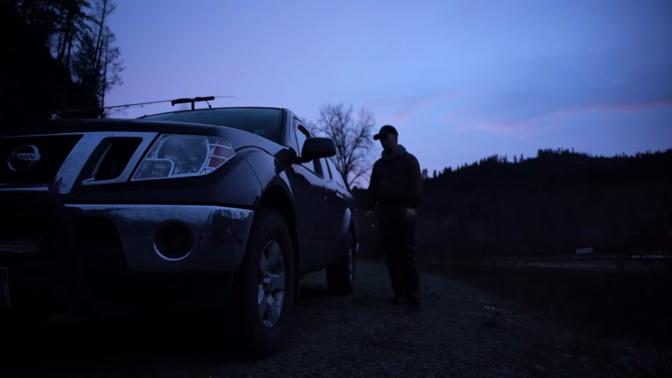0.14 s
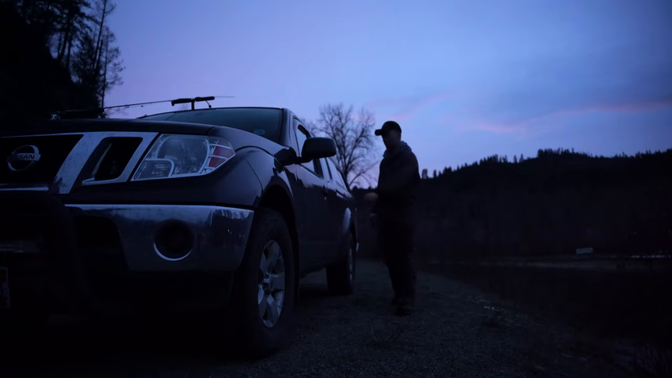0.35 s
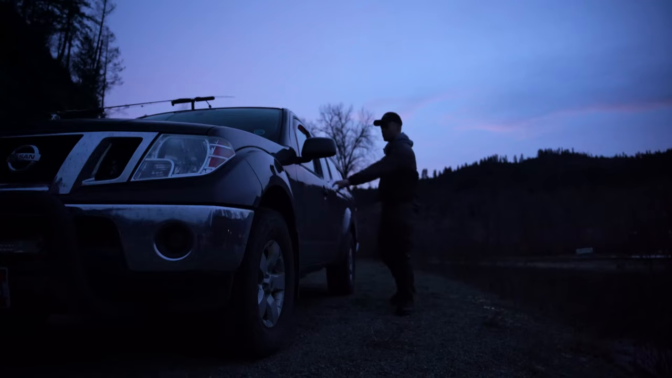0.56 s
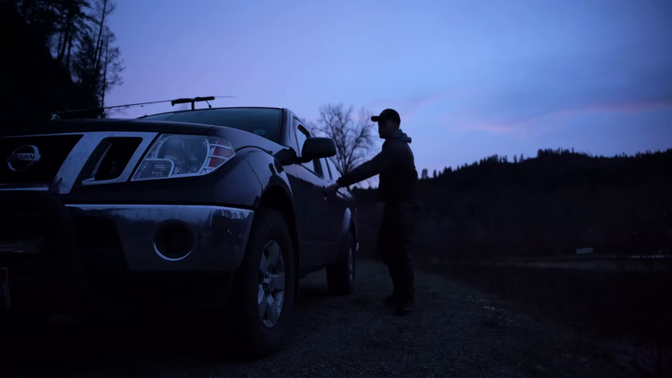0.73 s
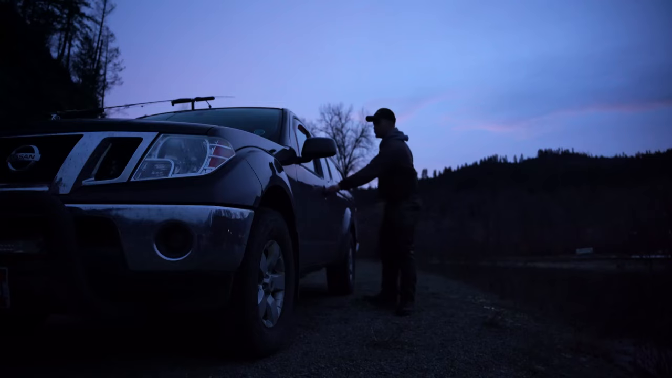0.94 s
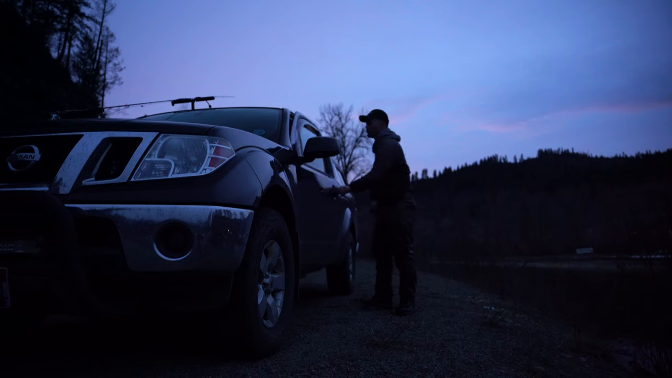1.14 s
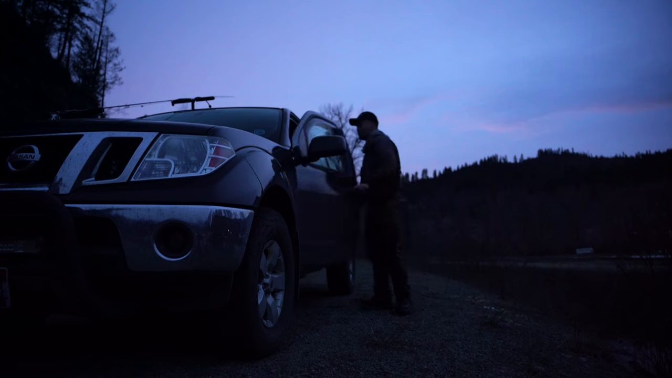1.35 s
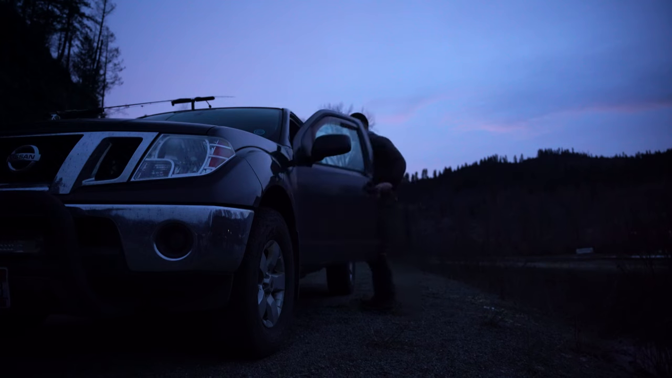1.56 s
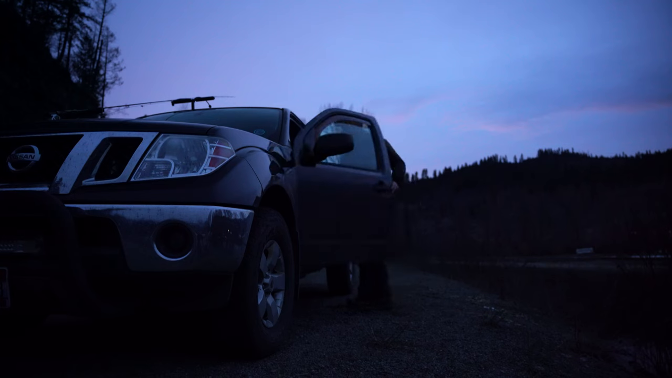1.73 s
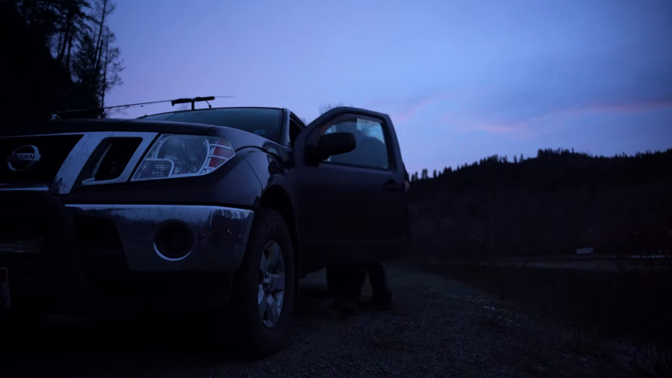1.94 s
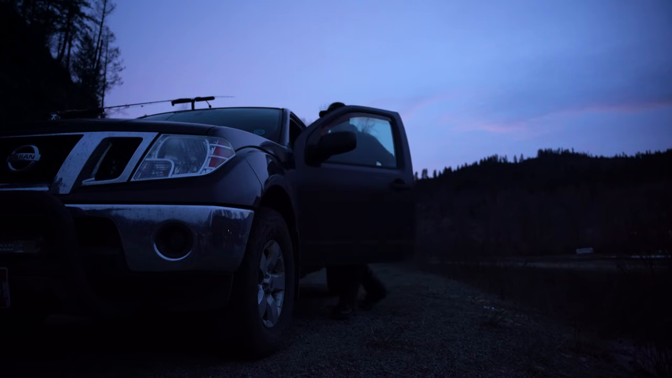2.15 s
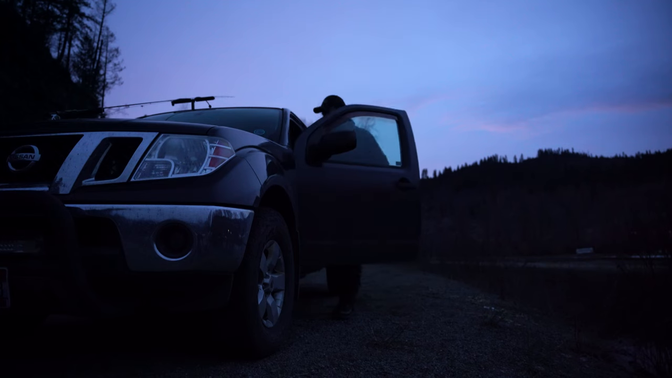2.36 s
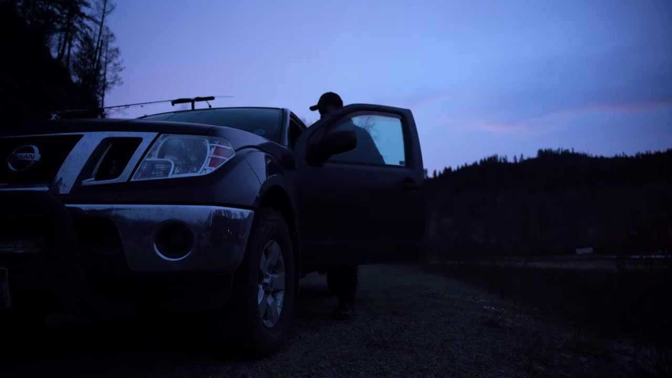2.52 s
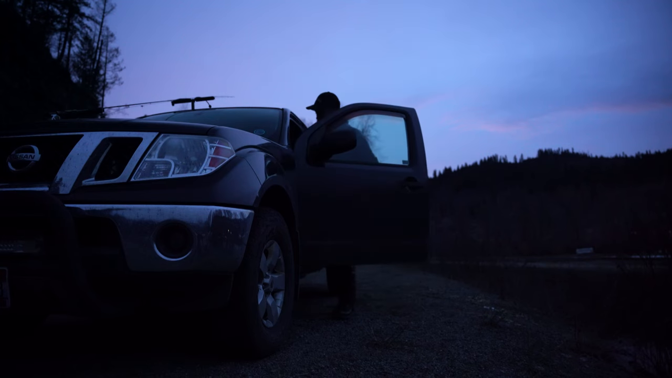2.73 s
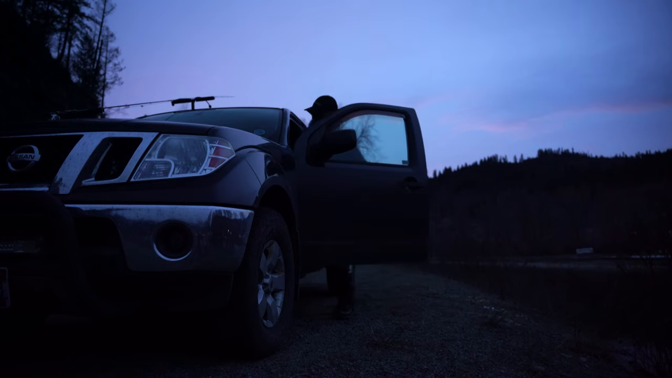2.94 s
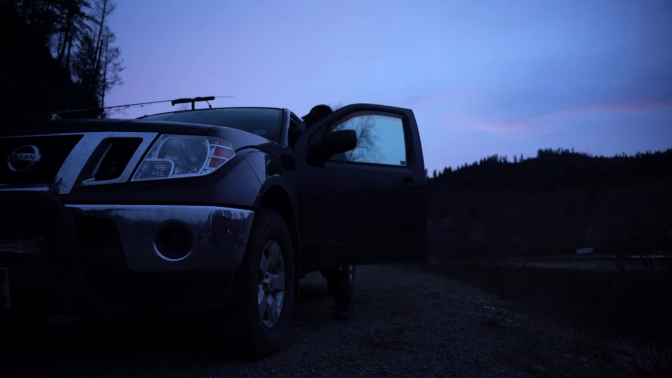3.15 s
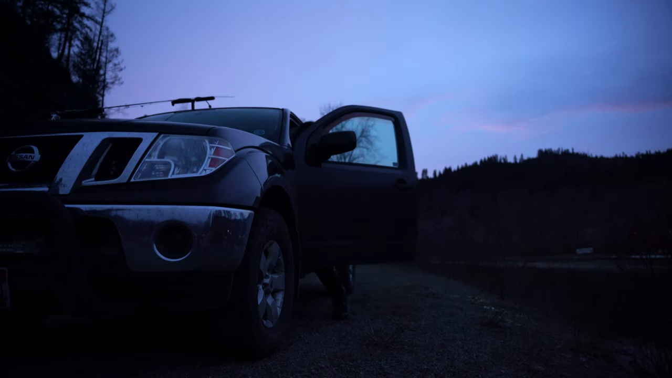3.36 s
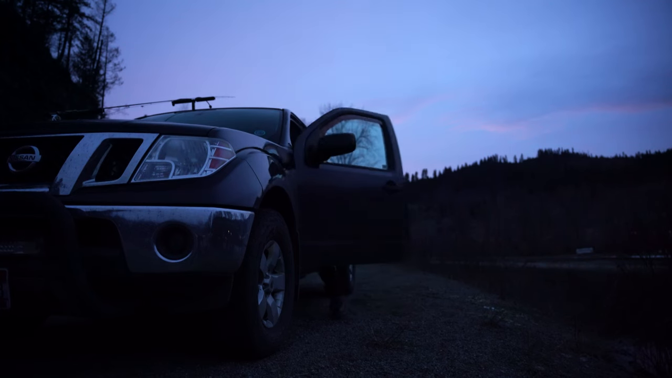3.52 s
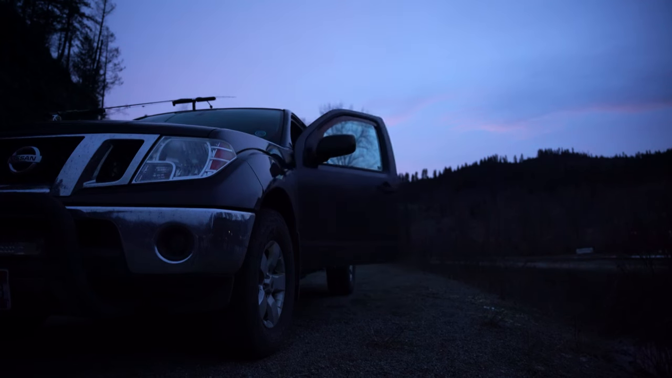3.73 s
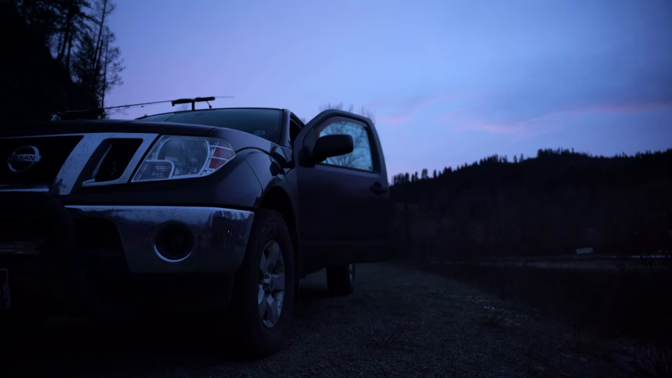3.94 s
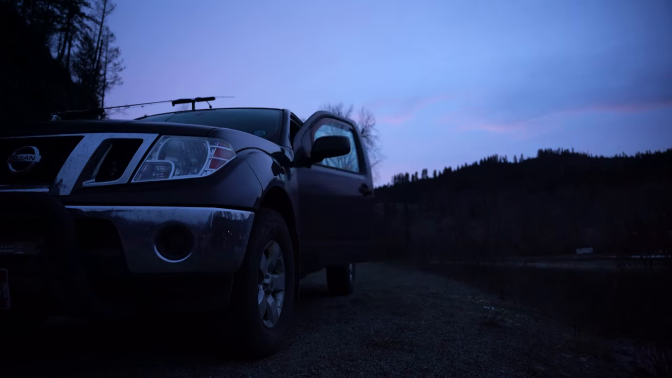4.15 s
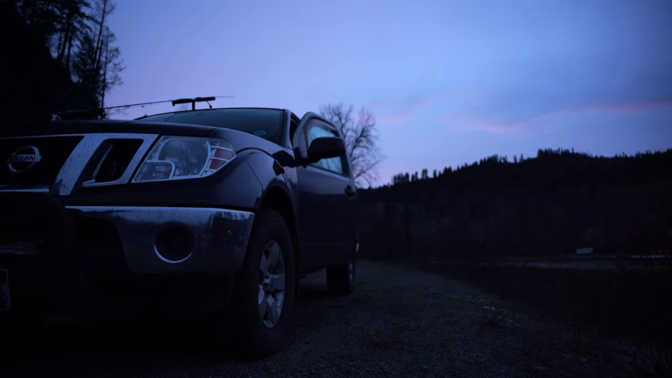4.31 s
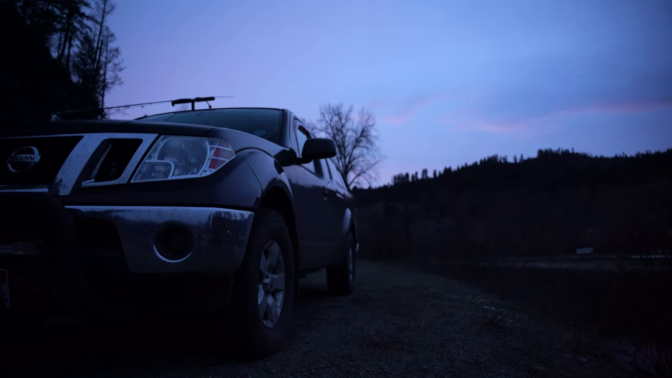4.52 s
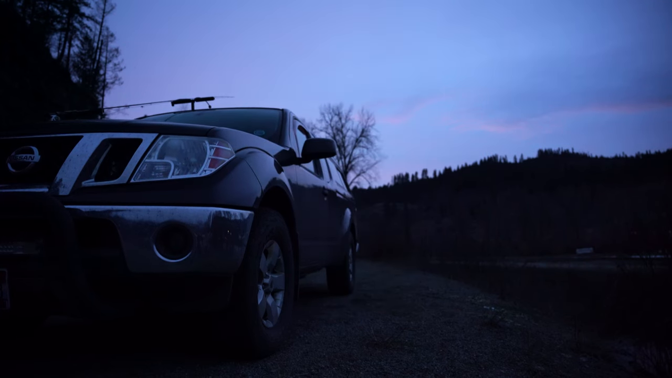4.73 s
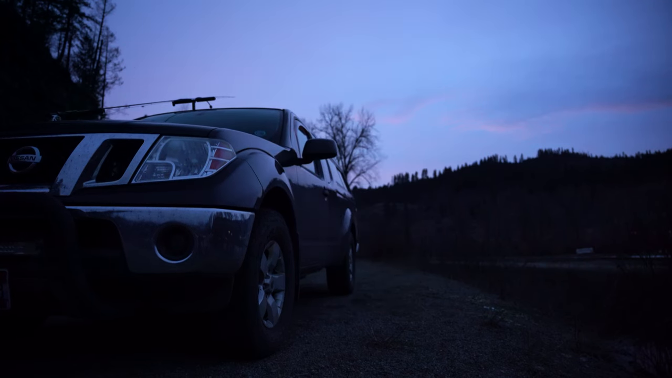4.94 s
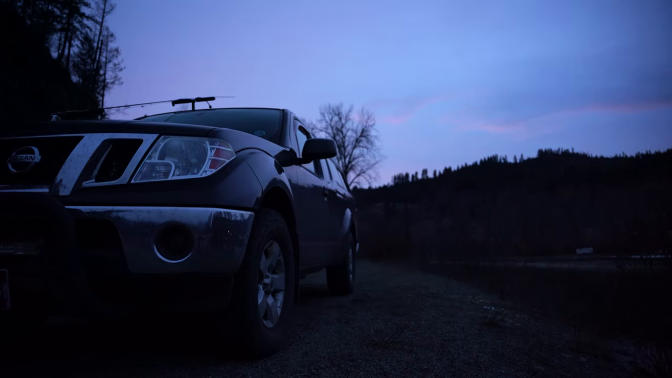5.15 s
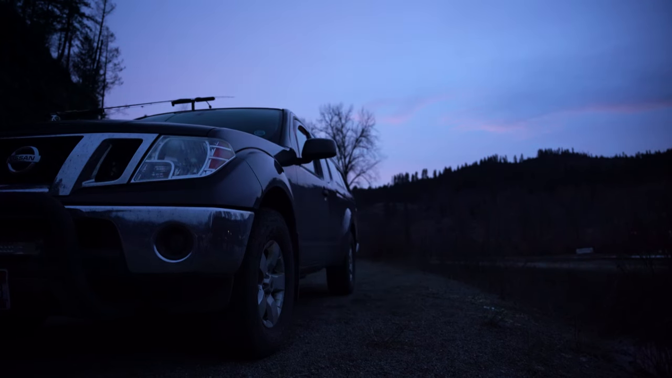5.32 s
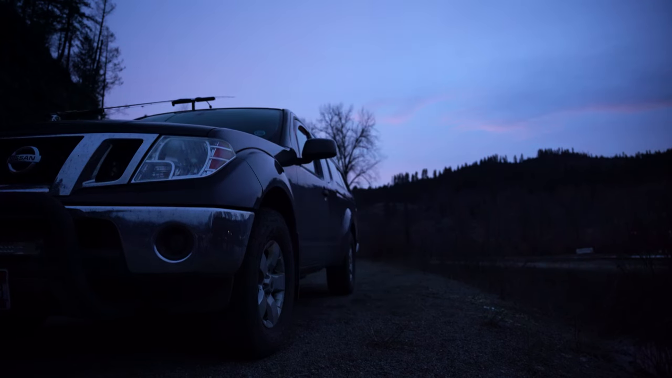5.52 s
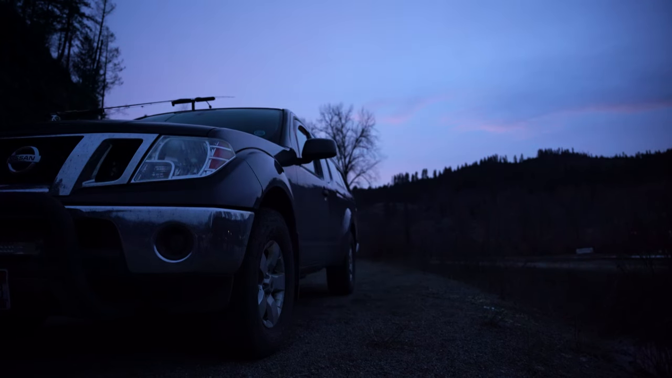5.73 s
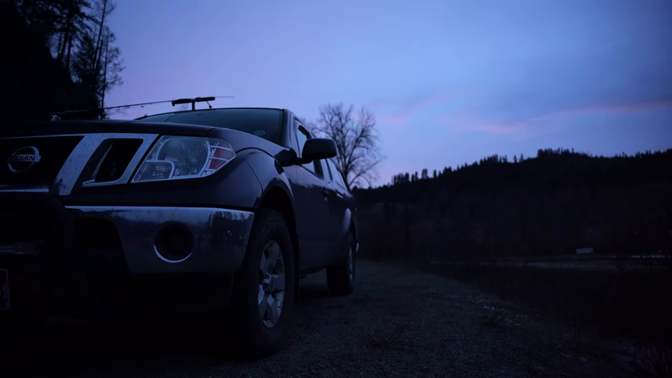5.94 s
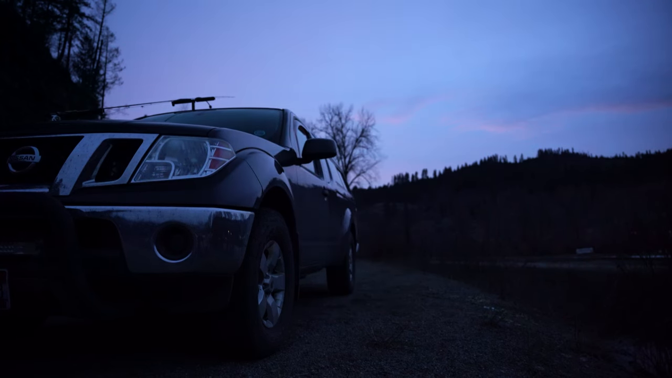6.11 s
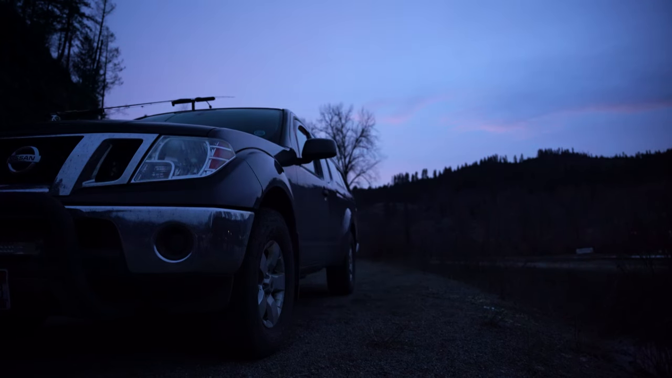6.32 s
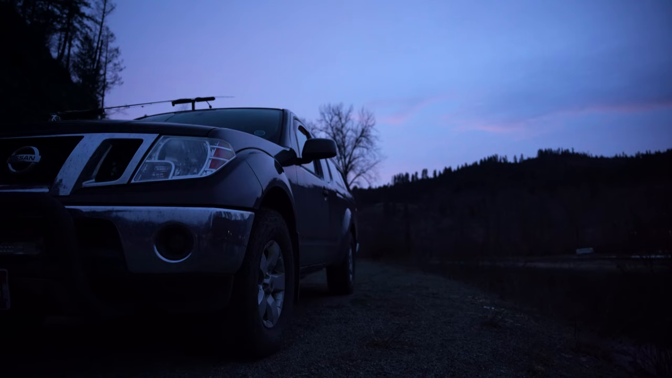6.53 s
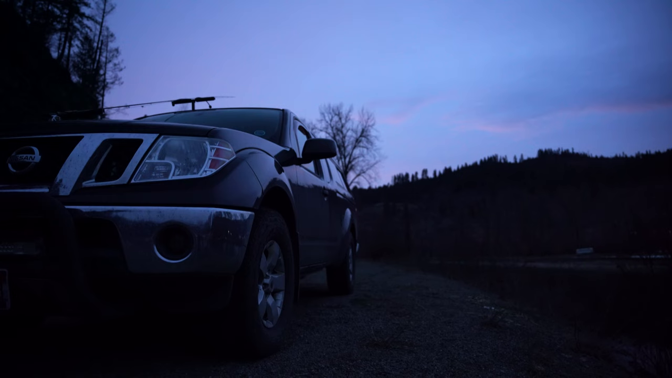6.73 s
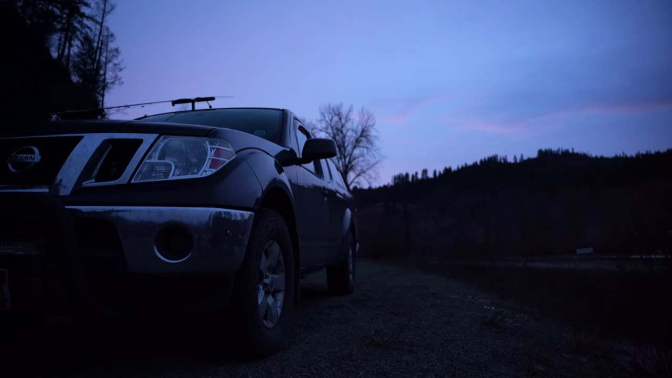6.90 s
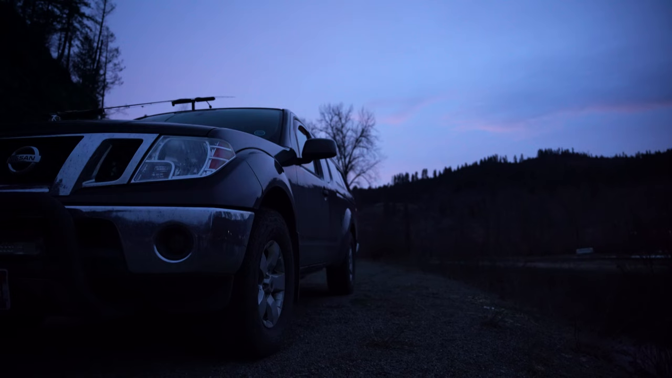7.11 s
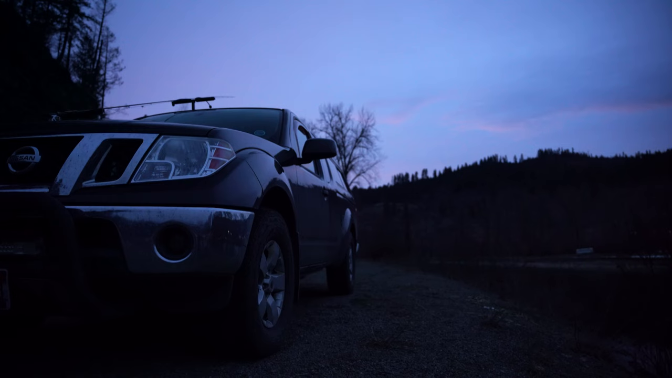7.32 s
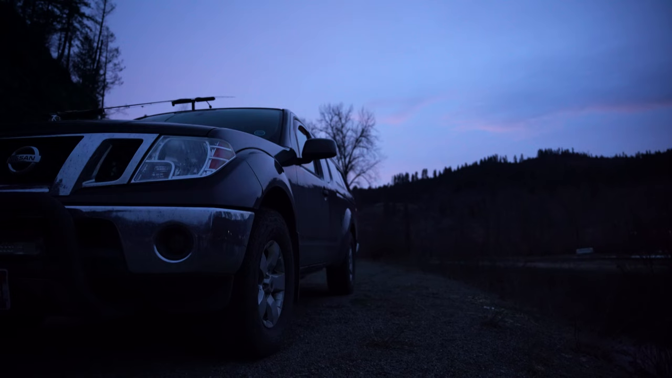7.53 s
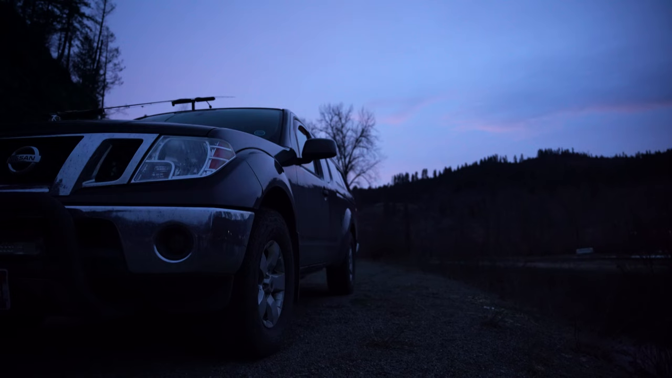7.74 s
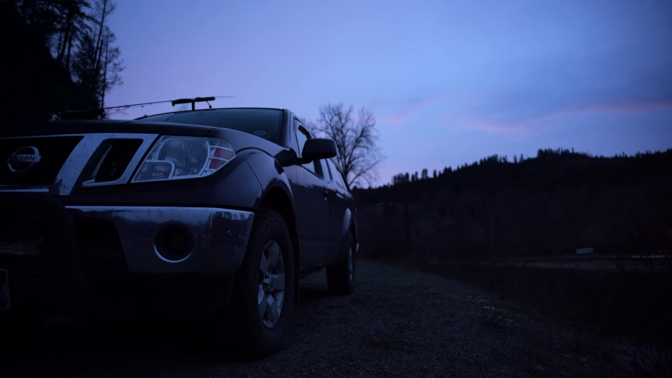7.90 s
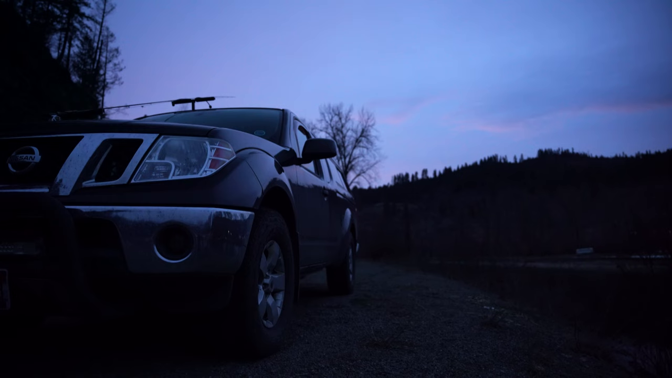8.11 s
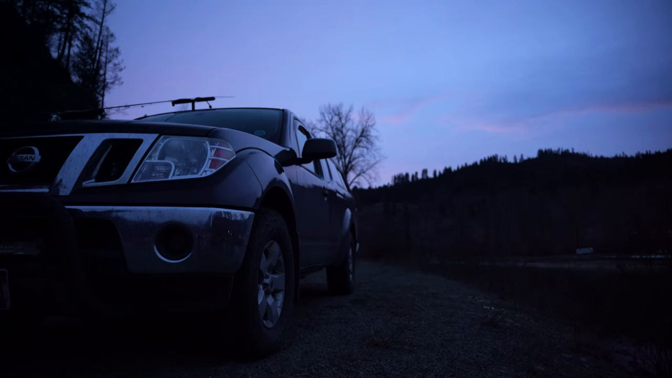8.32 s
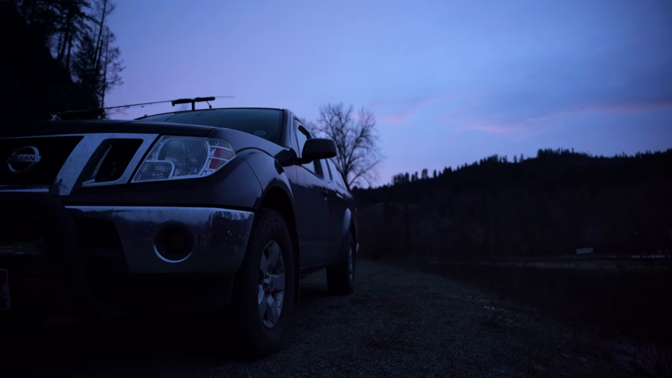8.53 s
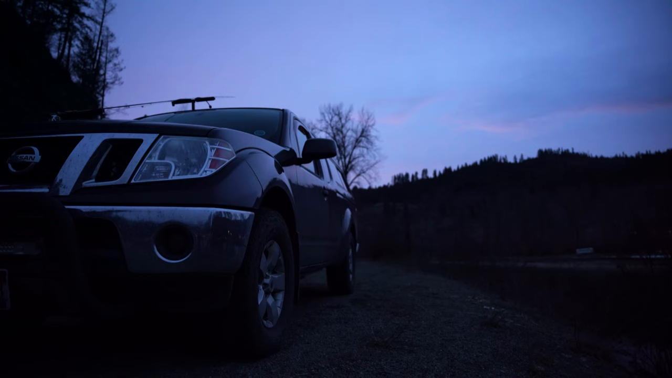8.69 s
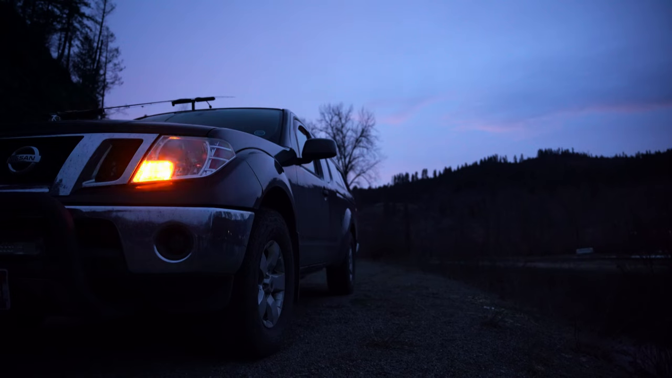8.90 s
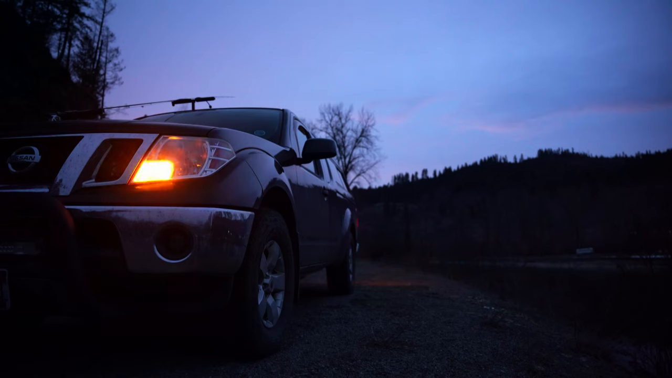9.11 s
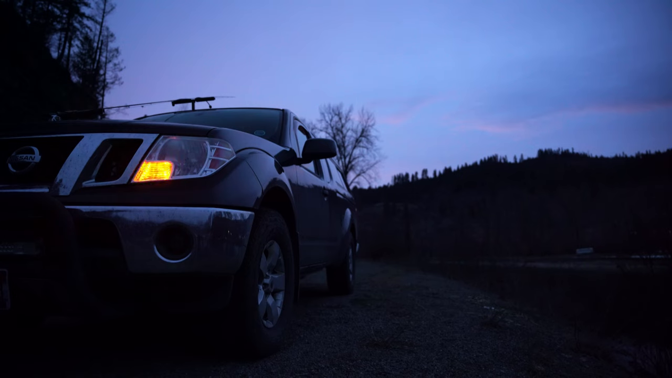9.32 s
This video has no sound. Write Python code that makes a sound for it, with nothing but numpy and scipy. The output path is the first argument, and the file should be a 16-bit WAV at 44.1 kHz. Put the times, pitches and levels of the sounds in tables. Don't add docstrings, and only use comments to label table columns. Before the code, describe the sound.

Quiet gravelly clicks, a latch crack, cabin bumps and a heavy door slam; after a near-silent pause a starter grinds and the engine begins to catch.

```python
import sys
import numpy as np
from scipy import signal
from scipy.fft import rfft, irfft, next_fast_len
from scipy.io import wavfile
from scipy.ndimage import uniform_filter1d, map_coordinates

SR = 44100
rng = np.random.default_rng(int(sys.argv[2]) if len(sys.argv) > 2 else 0)


def elevation(decibels):
    levels = np.asarray(decibels, float)
    return 10 ** (levels / 20)


def waveform_to_disk(signal):
    frames = np.transpose(np.atleast_2d(signal))
    scaled = np.clip(frames, -1, 1) * 32767
    samples = np.round(scaled).astype(np.int16)
    wavfile.write(sys.argv[1], SR, samples)


N = 417186
T = np.arange(N) / SR
KEY_TURN = round(8.4 * SR)


def unit(x):
    return x / np.sqrt(np.mean(x ** 2) + 1e-20)


def along(points, hz):
    f, v = np.transpose(points)
    return np.interp(np.log(hz + 1), np.log(f + 1), v)


def curves(rows):
    s, *cols = np.transpose(rows)
    return [np.interp(T, s, c) for c in cols]


def wobble(rate, size=N):
    knots = rng.standard_normal(int(size * rate / SR) + 4)
    return map_coordinates(knots, [T[:size] * rate])


def filtered(x, response):
    n = x.shape[-1]
    m = next_fast_len(n + 8192)
    return irfft(rfft(x, m) * response(np.fft.rfftfreq(m, 1 / SR)), m)[..., :n]


def resonance(f, hz, width_hz):
    return 1j * f * width_hz / (hz * hz - f * f + 1j * f * width_hz)


def band(n, hz, width_hz):
    noise = rng.standard_normal(n + SR // 10)
    return unit(filtered(noise, lambda f: resonance(f, hz, width_hz) ** 2)[-n:])


def add(track, s, sound):
    part = track[round(s * SR):][:len(sound)]
    part += sound[:len(part)]


def ring(hz, t60, attack):
    t = T[:int(1.5 * t60 * SR) + 2]
    return np.sin(2 * np.pi * hz * t) * elevation(-60 * t / t60) * (1 - np.exp(-t / attack))


def struck(modes, attack):
    out = np.zeros(SR)
    for hz, db, t60 in modes:
        add(out, 0, elevation(db) * ring(hz, t60, attack))
    return out


# frequency in Hz, likeness from 0 to 1.
ALIKE = [(60, 0.99), (240, 0.97), (950, 0.95), (3770, 0.85), (15000, 0.37)]


def rush(spectrum, patchy_db):
    z = signal.stft(rng.standard_normal((2, N)), nperseg=512)[2]
    field = uniform_filter1d(rng.standard_normal(z.shape[1:]), 6, 0)
    field = uniform_filter1d(field, 12, 1)
    pair = signal.istft(z * elevation(patchy_db * unit(field)), nperseg=512)[1][:, :N]

    def mid_side(f):
        turn = np.arccos(np.clip(along(ALIKE, f), -1, 1)) / 2
        return elevation(along(spectrum, f)) * [np.cos(turn), np.sin(turn)]

    mid, side = filtered(pair, mid_side)
    return unit(np.array([mid + side, mid - side]))


# time in seconds, road level in dB.
ROAD_FADE = [(0, -46.5), (4.3, -51), (6.8, -56), (8.47, -60)]
# frequency in Hz, level in dB per Hz.
ROAD_COLOUR = [(60, -37), (110, -18), (150, -8.5), (260, -2.5), (401, -0.5), (680, -1.5), (835, -3),
               (1280, -6), (5000, -20.5), (6500, -26.5), (11000, -120)]
# frequency in Hz, level in dB per Hz.
HISS_COLOUR = [(1470, -1.5), (2500, -3.5), (3220, -5.5), (5200, -8.5), (6920, -7), (14200, -15.5),
               (15800, -19)]
# time in seconds, rumble level in dB.
SWAY = [
    (0, -73),
    (2.5, -63.5),
    (3, -56.5),
    (4.4, -58),
    (4.75, -54),
    (5.1, -63.5),
    (6.5, -72.5),
]
# frequency in Hz, level in dB per Hz.
RUMBLE_COLOUR = [(12, -41), (20, 0), (43, 0.5), (113, -3.5), (151, -4), (250, -12), (320, -18), (550, -120)]


def valley():
    road_db, = curves(ROAD_FADE)
    road = elevation(road_db + 2 + 0.4 * wobble(5)) * rush(ROAD_COLOUR, patchy_db=0.9)
    hiss_db = -55 + 0.74 * (road_db - road_db[0])
    hiss = elevation(hiss_db + 0.44 * wobble(25)) * rush(HISS_COLOUR, patchy_db=0.15)
    rumble = elevation(curves(SWAY)[0] + 3.5 * wobble(9)) * rush(RUMBLE_COLOUR, patchy_db=0.5)
    return road + hiss + rumble


def gravel():
    out = np.zeros(N)
    for when, pitch, size in rng.random((420, 3)):
        db = -58 - 4 * np.log(size + 0.02)
        add(out, 4.5 * when, elevation(db) * ring(3500 * 4 ** pitch, t60=0.004, attack=0.0002))
    return out


# start in seconds, peak in dB, pitch in Hz.
THUMPS = [(0.199, -50, 212), (0.778, -38.5, 137), (0.79, -43, 90), (0.899, -36, 127), (0.959, -24, 86),
          (1, -41, 64.6), (1.338, -44.5, 135), (1.691, -45.5, 129), (1.889, -46, 153), (2.654, -42, 188),
          (2.664, -45, 416), (2.82, -36, 150.5), (2.835, -34, 65), (2.87, -36.5, 120), (2.94, -32.5, 135),
          (3.142, -46, 88.8), (3.449, -48, 56.5), (3.519, -49, 124), (3.73, -45, 133), (3.87, -37, 141),
          (4.019, -51, 86.1), (4.401, -42.5, 160), (4.886, -46, 141), (8.139, -51, 188), (8.219, -52, 87.5)]
# start in seconds, peak in dB, pitch in Hz.
TICKS = [(.246, -48, 13000), (.488, -51, 9100), (.803, -54, 9600), (.83, -54, 13000), (.89, -52, 14800),
         (.99, -55, 10000), (1.158, -50, 6000), (1.292, -53, 11500), (1.31, -55, 10800), (1.68, -56, 10700),
         (1.725, -55, 9200), (1.83, -47, 4900), (2.04, -52, 10500), (.298, -55, 11500), (.528, -55, 9600),
         (.644, -55, 9600), (.845, -54, 11600), (.895, -54, 10700), (1.122, -53, 6600), (1.157, -52, 6800),
         (1.646, -55, 15000), (1.648, -56, 10300), (1.757, -55, 13000), (2.149, -40, 2300),
         (2.266, -56, 9600), (2.436, -54, 10300), (2.64, -50, 9100), (3.02, -53, 7600), (4.152, -54, 7000),
         (4.395, -58, 12800), (4.411, -56, 6400), (4.415, -54, 12500), (4.417, -52, 8000),
         (4.434, -56, 8800), (4.449, -55, 5200), (4.459, -57, 9100), (4.462, -55, 6200), (4.53, -58, 11000),
         (4.604, -53, 5450), (4.605, -51, 13000), (4.895, -56, 9200), (4.95, -58, 11300),
         (4.862, -53, 8700), (5.58, -56, 7700), (6.662, -56, 7000)]
# start in seconds, peak in dB, pitch in Hz, t60 in seconds.
KEYS = [(1.347, -50, 10930, .12), (1.347, -56, 15000, .05), (2.387, -54, 13000, .05),
        (2.52, -56, 11600, .06), (4.415, -46, 1080, 0.07), (4.414, -45, 2340, .05),
        (4.533, -47, 3600, .015), (4.619, -48, 3550, .03), (4.674, -47, 3550, .04),
        (8.473, -58, 7800, .035), (8.14, -45, 378, 0.091)]
# start in seconds, length in seconds, rms level in dB, centre in Hz.
SCUFFS = [(0.107, 0.16, -55, 13300), (0.867, 0.0091, -39.5, 2300), (0.879, 0.054, -50, 1910),
          (0.998, 0.23, -56, 1600), (1.068, 0.011, -44, 1600), (1.457, .01, -50, 3280),
          (1.868, 0.094, -47.5, 1030), (1.871, 0.13, -55, 10500), (1.874, .1, -53, 14500),
          (2.4, 0.037, -60, 13000), (2.561, 0.1, -50.5, 1710), (2.598, 0.058, -48.5, 2050),
          (2.639, 0.032, -44.5, 1800), (2.648, .02, -48, 1250), (4.413, 0.037, -51, 2340),
          (4.416, 0.034, -47, 1160), (4.951, 0.061, -49.5, 413)]


def driver():
    out, t = np.zeros(N), T[:SR // 4]
    thump_t60 = 0.28
    for s, db, hz in THUMPS:
        shake = band(len(t), hz, 1.77 * hz)
        add(out, s, elevation(db) * ring(hz, 0.74 * thump_t60, attack=0.0029))
        add(out, s, elevation(db - 5.5 - 60 * t / thump_t60) * shake * np.clip(t / 0.0026, 0, 1))
    for s, db, hz in TICKS:
        add(out, s, elevation(db + 6.5) * ring(hz, t60=0.0066, attack=0.000067))
    for s, db, hz, t60 in KEYS:
        add(out, s, elevation(db) * ring(hz, t60, attack=0.00097))
    for s, length, db, hz in SCUFFS:
        clumps = rng.exponential(size=SR // 400 + 1) ** 0.55
        grit = rng.standard_normal(len(t)) * np.repeat(clumps, 100)[:len(t)]
        scrape = unit(filtered(grit, lambda f: resonance(f, hz, 0.6 * hz) ** 2))
        add(out, s, elevation(db) * scrape * np.sin(np.pi * np.clip(t / length, 0, 1) ** 0.41))
    return out


# frequency in Hz, level in dB per Hz.
LATCH_CRACK = [(180, -23), (600, -11), (1100, -6), (1550, -2), (2050, -2), (3500, -14.5), (6000, -30),
               (15800, -33)]
# frequency in Hz, level in dB, t60 in seconds.
LATCH_MODES = [(124, -1.5, 0.14), (200, -7, 0.16), (337, -11, 0.036), (710, -8, 0.054), (860, -18, 0.08),
               (1200, -17, 0.06), (1530, -16, 0.05), (1850, -10, 0.075)]
# centre in Hz, width in Hz, dB under the crack, t60 in seconds.
LATCH_TRIM = [(60, 82, -19, 0.43), (328, 230, -6.5, 0.17), (1094, 130, -10, 0.05), (1970, 250, -10, 0.092),
              (1490, 2300, -8.5, 0.11), (3500, 11000, -12.5, 0.042)]
# frequency in Hz, level in dB per Hz.
SEAL_CRACK = [(180, -6), (300, 0), (700, -9), (1670, -10), (2600, -19), (4000, -33), (15800, -65)]
# frequency in Hz, level in dB per Hz.
SLAM_CRACK = [(180, -7), (300, -2), (545, -21), (896, -5), (1450, -17), (1800, -11), (3000, -22),
              (5290, -39), (15800, -38)]
# frequency in Hz, level in dB, t60 in seconds.
PANEL_MODES = [(48, -18, 0.41), (93.3, 0.5, 0.38), (135, 0.5, 0.29), (188, 3.5, 0.19), (246, -3.5, 0.25),
               (308, -17, .25), (1337, -20, 0.29), (1750, -22, .1), (1950, -16, .2)]
# centre in Hz, width in Hz, dB under the crack, t60 in seconds.
PANEL_TRIM = [(60, 130, -9.5, 0.57), (218, 240, -13.5, 0.41), (293, 140, -17, 0.27), (800, 430, -11, 0.12),
              (1600, 1000, -20, 0.31), (1714, 200, -14, 0.092), (3560, 3600, -24, 0.063)]
# start in seconds, crack in dB, panel ring in dB, crack t60 in seconds.
DOOR = [
    (1.4602, -23.5, -19, 0.036),
    (4.55, -28.5, -45, 0.071),
    (4.569, -23.5, -45, 0.052),
    (4.5743, -18, -21.5, 0.033),
]
# start in seconds, peak in dB, pitch in Hz, t60 in seconds.
SNAPS = [(1.4606, -21, 1084, .022), (1.4608, -26, 2080, 0.019), (1.4612, -23, 1560, .012),
         (1.461, -38, 4280, .02), (1.4615, -30, 2700, .015), (1.465, -31, 1140, .02),
         (1.47, -32, 2050, 0.04), (4.5503, -33, 1670, .03), (4.569, -27, 1810, .03),
         (4.571, -32, 2920, .015), (4.5744, -20.5, 1785, 0.046), (4.5747, -25, 900, 0.023),
         (4.5747, -19, 1300, .012), (4.5747, -23, 2320, 0.0089), (4.5754, -42, 5300, 0.0063),
         (4.416, -36, 1300, 0.028), (4.422, -39, 1100, .05), (4.416, -43, 2350, .04),
         (4.587, -25, 1750, .03), (4.594, -35, 1290, 0.036), (4.594, -33, 2200, .03),
         (4.6042, -32, 1570, 0.045), (4.6042, -33, 2400, .02), (4.621, -35, 2100, .03)]


def door():
    out, t = np.zeros(N), T[:SR // 2]
    colours = [LATCH_CRACK, SEAL_CRACK, SLAM_CRACK, SLAM_CRACK]
    for i, (s, crack_db, ring_db, t60) in enumerate(DOOR):
        opening = i == 0
        modes, trim = (LATCH_MODES, LATCH_TRIM) if opening else (PANEL_MODES, PANEL_TRIM)
        lag = 0.0003 if opening else 0
        crack = unit(filtered(rng.standard_normal(len(t)), lambda f: elevation(along(colours[i], f))))
        add(out, s, elevation(crack_db - 60 * t / t60) * crack * np.clip(t / 0.0007, 0, 1))
        add(out, s + lag, elevation(ring_db - 1.5) * struck(modes, attack=0.0018))
        for hz, width_hz, db, fade in trim:
            shake = band(len(t), hz, width_hz) * np.clip(t * hz, 0, 1)
            add(out, s, elevation(crack_db + db - 60 * t / fade) * shake)
    for s, db, hz, t60 in SNAPS:
        add(out, s, elevation(db) * ring(hz, t60, attack=0.0003))
    push = np.pad(np.hanning(int(0.0043 * SR)), (0, SR // 4))
    add(out, DOOR[-1][0] + 0.0017, -elevation(-4) * filtered(push, lambda f: resonance(f, 80, 420)))
    return out


def fuel_pump():
    swell = np.clip((T - 8.2) / 0.12, 0, 1) * (T < 8.5)
    return elevation(-63) * swell * band(N, 91, 25)


# time in seconds, brush whine in Hz, grind level in dB.
SPIN = [(8.51, 2992, -31), (8.7, 4208, -29), (8.775, 4417, -32.5), (8.825, 6603, -36.5), (8.86, 7300, -37),
        (9.07, 7905, -39), (9.3, 7980, -37.5), (9.4, 9390, -31.5), (9.46, 9610, -28)]


def motor(t):
    top_hz, load_db = np.array(curves(SPIN))[:, KEY_TURN:]
    times = np.array([row[0] for row in OVERRUNS])
    cycle = np.interp(t, times[1:], np.arange(len(times) - 1)) % 1
    sag = np.sin(np.pi * cycle ** 0.8)
    since = np.abs(t - times[np.clip(np.searchsorted(times, t) - 1, 0, None)])
    hush_db = 15 * np.exp(-since / 0.045)
    freed_db = 60 * np.clip(t - times[-1], 0, None) / 1.2
    return top_hz - 698 * sag, -50 - hush_db - freed_db, load_db - 6 * sag


# start in seconds, rattle in dB, hold in seconds, t60 in seconds, knock in dB.
CLASH = [
    (8.494, -35, 0.013, .035, -34),
    (8.508, -25.5, 0.029, 0.1, -17.5),
    (8.531, -36, .01, .05, -26),
]
# start in seconds, rattle in dB, hold in seconds, knock in dB.
OVERRUNS = [
    (8.699, -31, 0.088, -48),
    (8.859, -25, 0.027, -33),
    (8.96, -25, 0.033, -25),
    (9.064, -24, 0.018, -24.5),
    (9.159, -23.5, 0.014, -22),
    (9.25, -27, 0.032, -23),
]


def tooth_contacts(t, on, grind_db):
    rattle, knock = on * elevation(grind_db), np.zeros(len(t))
    slaps = [(s, db, hold, 0.18, knock_db) for s, db, hold, knock_db in OVERRUNS]
    for s, db, hold, t60, knock_db in CLASH + slaps:
        age = np.clip(t - s, 0, None)
        fade_db = 60 * np.clip(age - hold, 0, None) / t60
        rattle += elevation(db - fade_db) * np.clip(age / 0.012, 0, 1) ** 0.85
        knock += elevation(knock_db - 60 * age / 0.051) * np.clip(age / 0.0065, 0, 1) ** 1.1
    return rattle, knock


# frequency in Hz, width in Hz, level in dB.
HOUSING = [(470, 65, -3), (920, 160, -6.5), (1030, 33, -4), (1160, 26, -5), (1482, 28, -5), (1660, 35, -5),
           (1856, 27, -5), (2050, 53, -10), (2262, 45, -6), (2440, 35, -7), (2660, 36, -9), (2940, 45, -5),
           (3500, 330, -17), (7600, 550, -29)]
# frequency in Hz, level in dB per Hz.
CASTING = [(59, -56), (100, -18), (327, -7), (490, -2.5), (650, -9.5), (1100, -11.5), (2300, -10.5),
           (3600, -15.5), (4100, -22), (6500, -27), (8200, -30), (9000, -38), (12500, -37), (15800, -50)]


def grinding(rattle, whine_hz):
    n = len(rattle)
    mesh_hz = whine_hz / 15 * (1 + 0.4 * wobble(300, size=n))
    mesh = np.diff(np.floor(np.cumsum(mesh_hz) / SR), prepend=0) != 0
    hits = mesh * rng.lognormal(0, 0.2, n) * rng.choice([-1, 1], n)
    blows = filtered(hits, lambda f: resonance(f, 800, 4500))
    scrape = unit(np.abs(blows) ** 0.35 * rng.standard_normal(n))
    teeth = 0.45 * unit(blows) + 0.8 * scrape + 0.6 * rng.standard_normal(n)

    def colour(f):
        housing = 0
        for k, (hz, width_hz, db) in enumerate(HOUSING):
            housing = housing + (-1) ** k * elevation(db - 13) * resonance(f, hz, width_hz)
        return np.abs(housing * resonance(f, 1500, 9000)) + elevation(along(CASTING, f) - 3)

    return filtered(teeth * rattle, colour) / np.sqrt(np.mean(filtered(teeth, colour) ** 2))


# start in seconds, length in seconds, frequency in Hz, rms level in dB.
SWEEP = [(8.509, 0.07, 474.5, -30.5), (8.53, .03, 870, -34), (8.506, .03, 1400, -32.5),
         (8.534, 0.034, 1030, -29), (8.592, .025, 475, -26.5), (8.605, 0.054, 522, -27.5),
         (8.65, 0.05, 518, -32), (8.592, 0.11, 1886, -31), (8.701, .09, 2300, -42), (8.6, .04, 1030, -30.5),
         (8.738, 0.062, 2340, -27.5), (8.786, 0.04, 504, -31), (8.799, 0.024, 910, -31),
         (8.885, .025, 800, -24), (9.268, 0.058, 1870, -30.5), (9.33, 0.13, 505, -39),
         (9.381, 0.045, 1880, -36), (9.42, .04, 298, -32), (9.434, 0.021, 1050, -42)]
# frequency in Hz, width in Hz, length and delay in seconds, dB over rattle.
SINGS = [(507, 33, 0.089, .015, -11.5), (880, 154, 0.057, 0.012, -5.5), (696.8, 200, 0.043, 0.00503, -11),
         (1160, 66, 0.043, 0.0095, -6.5), (1840, 31, 0.036, 0.0057, -8.5), (2400, 97, 0.037, 0.00053, -10)]


def singing(n):
    out = np.zeros(n)
    notes = [(s, length, hz, 0.055 * hz, db) for s, length, hz, db in SWEEP]
    for s, db, *_ in OVERRUNS[1:]:
        notes += [(s + delay, length, hz, width, db + over) for hz, width, length, delay, over in SINGS]
    for s, length, hz, width_hz, db in notes:
        t = T[:int(length * SR)]
        swell = np.sin(np.pi * (t / length) ** 0.44) * band(len(t), hz, width_hz)
        add(out, s - T[KEY_TURN], elevation(db - 6) * unit(swell))
    return out


# time in seconds, rate in teeth per second.
TOOTH_RATE = [(8.53, 280), (8.585, 295), (8.64, 288), (8.685, 302), (8.7, 406), (8.735, 390), (8.75, 357),
              (8.775, 350), (8.81, 350)]
# start in seconds, length in seconds, multiple of tooth rate, rms level in dB.
STRANDS = [(8.545, 0.16, 1, -37), (8.572, 0.062, 3, -32.5), (8.652, 0.045, 3, -31), (8.615, .07, 4, -33),
           (8.53, .06, 5, -34), (8.635, 0.038, 2, -34.5), (8.699, 0.051, 2, -26), (8.7, 0.035, 3, -30.5),
           (8.715, .035, 1, -29.5), (8.738, 0.023, 3, -26), (8.758, .035, 3, -31), (8.752, .04, 2, -29),
           (8.77, 0.035, 1, -29)]


def strands(t):
    rate = np.interp(t, *np.transpose(TOOTH_RATE)) * (1 + 0.016 * wobble(148, size=len(t)))
    turn = 2 * np.pi * np.cumsum(rate) / SR
    out = np.zeros(len(t))
    for s, length, multiple, db in STRANDS:
        swell = np.sin(np.pi * np.clip((t - s) / length, 0, 1) ** 0.69) ** 0.61
        level = elevation(db + 1.5 + 2.5 * wobble(80.2, size=len(t)))
        out += level * swell * np.sin(round(multiple) * turn)
    return out


# start in seconds, length in seconds, frequency in Hz, rms level in dB.
HUMS = [(8.862, .03, 467, -27), (8.885, .03, 461, -22), (8.92, 0.02, 495, -32), (8.966, .026, 475, -25.5),
        (8.994, 0.027, 470, -27), (9.03, 0.028, 505.2, -33), (9.07, 0.039, 494, -26),
        (9.105, 0.019, 488, -27.5), (9.123, 0.038, 472, -30), (9.166, .024, 458, -21.5),
        (9.188, .022, 482, -23), (9.21, 0.038, 498, -32.5), (9.252, 0.02697, 487, -20.5),
        (9.28, 0.022, 510, -25), (9.303, .016, 505, -30.5), (8.974, 0.023, 858, -25.5),
        (9.08, .016, 882, -25), (9.171, 0.016, 894, -23.5)]


def humming(n):
    out = np.zeros(n)
    for s, length, hz, db in HUMS:
        t = T[:int(length * SR)]
        pitch = hz * (1 + 0.018 * wobble(130, size=len(t)))
        turn = 2 * np.pi * (rng.random() + np.cumsum(pitch) / SR)
        swell = np.sin(np.pi * t / length) ** 0.58
        add(out, s - T[KEY_TURN], elevation(db + 3.5) * swell * np.sin(turn))
    return out


# time in seconds, trim in dB.
WHINE_TRIM = [(8.7, -6), (8.78, -9), (8.83, -7), (8.9, -2), (9.07, -2), (9.11, -8), (9.46, -10)]


def brush_whine(whine_hz, whine_db):
    n = len(whine_hz)
    turn = 2 * np.pi * np.cumsum(whine_hz * (1 + 0.011 * wobble(500, size=n))) / SR
    tones = np.sin(turn) + 0.18 * np.sin(1.5 * turn) + 1.1 * np.sin(turn / 2)
    return elevation(whine_db + curves(WHINE_TRIM)[0][KEY_TURN:] + 3 + 4 * wobble(70, size=n)) * tones


# frequency in Hz, level in dB per Hz.
KNOCK = [(2000, 7), (4000, 3.5), (8000, -1), (11000, -12), (15900, -16)]


def starter():
    t = T[KEY_TURN:]
    n = len(t)
    whine_hz, whine_db, grind_db = motor(t)
    on = np.clip((t - SPIN[0][0]) / 0.0055, 0, 1)
    rattle, knock = tooth_contacts(t, on, grind_db)
    steel = unit(filtered(rng.standard_normal(n), lambda f: elevation(along(KNOCK, f)) * (f > 1500)))
    rocking = elevation(-35.5) * on * np.sqrt(rattle) * band(n, 59, 86)
    hiss = elevation(-54.5) * band(n, 7360, 1300) + elevation(-48.5) * band(n, 3480, 350)
    brushes = on * (elevation(3.9 * wobble(150, size=n)) * hiss + brush_whine(whine_hz, whine_db))
    gears = grinding(rattle, whine_hz) + singing(n) + humming(n) + strands(t)
    return gears + knock * steel + brushes + rocking


# time in seconds, exhaust level in dB.
CATCH = [
    (9.32, -39),
    (9.39, -41),
    (9.46, -29),
]
# start in seconds, peak in dB.
FIRINGS = [
    (9.363, -30),
    (9.391, -21),
    (9.424, -33),
    (9.447, -24),
]


def engine():
    t = T[KEY_TURN:]
    n = len(t)
    exhaust_db = curves(CATCH)[0][KEY_TURN:]
    on = np.clip((t - CATCH[0][0]) / 0.035, 0, 1)
    boom = band(n, 89, 93) + 0.46 * band(n, 210, 190.3)
    air = band(n, 12500, 6900) + 0.45 * band(n, 7700, 900) + 0.58 * band(n, 5000, 3000)
    air_db = -38 + 0.19 * (exhaust_db - exhaust_db[-1]) + 2.3 * wobble(70.9, size=n)
    air_db -= 5.5 * (t < 9.388)
    out = on * (elevation(exhaust_db + 1.5) * boom + elevation(air_db) * air)
    out += elevation(-48) * band(n, 12000, 4000) * np.exp(-((t - 9.113) / 0.006) ** 2)
    for s, db in FIRINGS:
        add(out, s - t[0], elevation(db) * ring(111, t60=0.058, attack=0.0018))
    return out


# frequency in Hz, left over right in dB.
LEFT_DB = [(60, 2.5), (180, -0.5), (550, 5), (900, 9), (2400, 9.5), (4970, 4), (15000, 5.5)]
# frequency in Hz, phase by which left leads in radians.
LEAD = [(0, 0), (500, -.2), (1200, -.05), (2070, 2.3), (3270, 3.1), (4500, 3.5), (5170, 4.5), (6030, 8.5),
        (6900, 9.85), (8270, 11.9), (9500, 11.4), (11200, 12.4), (14600, 10.7)]


def from_left(pair):
    half = lambda f: elevation(along(LEFT_DB, f) / 2) * np.exp(0.5j * np.interp(f, *np.transpose(LEAD)))
    return filtered(pair, lambda f: np.array([half(f), 1 / half(f)]))


# frequency in Hz, share from 0 to 1 heard differently at each port.
SPREAD = [(100, .005), (700, .012), (1400, .24), (2070, .34), (3400, .12), (5200, .32), (6900, .2),
          (15000, .38)]


def engine_bay():
    shared, own = starter() + engine(), starter() + engine()
    common = filtered(shared, lambda f: np.sqrt(1 - along(SPREAD, f)))
    apart = filtered(own, lambda f: np.sqrt(along(SPREAD, f)))
    pair = from_left(np.array([common + apart, common - apart]))
    return np.pad(pair, ((0, 0), (KEY_TURN, 0)))


def scattered(x, share, t60):
    scatter = rng.standard_normal((2, SR // 10)) * elevation(-60 * T[:SR // 10] / t60)
    echoes = signal.fftconvolve(x[None], scatter / np.linalg.norm(scatter[0]), axes=1)[:, :N]
    part = lambda f: np.clip(along(share, f), 0, 1)
    return filtered(x, lambda f: np.sqrt(1 - part(f))) + filtered(echoes, lambda f: np.sqrt(part(f)))


# frequency in Hz, scattered share from 0 to 1.
CAB_SCATTER = [(60, .0005), (250, .002), (1000, 0.015), (10000, 0.25)]
# frequency in Hz, phase by which left leads in radians.
CAB_LEAD = [(30, -.1), (90, -.16), (200, -.3), (1000, -.12), (3000, -.1), (6000, .3)]


def scene():
    cab = scattered(driver() + gravel() + door() + fuel_pump(), CAB_SCATTER, t60=0.014)
    tilt = elevation([[0.4], [-0.4]])
    placed = filtered(cab, lambda f: tilt * np.exp([[0.5j], [-0.5j]] * along(CAB_LEAD, f)))
    return valley() + placed + engine_bay()


def band_limit(x):
    return signal.sosfilt(signal.butter(12, 15840, fs=SR, output="sos"), x)


def record(dry):
    heard = filtered(dry, lambda f: (f < 15835) / (1 + 32 / (1j * f + 1e-3)) ** 2)
    return band_limit(heard)


dry = scene()
out = record(dry)
waveform_to_disk(out)
```